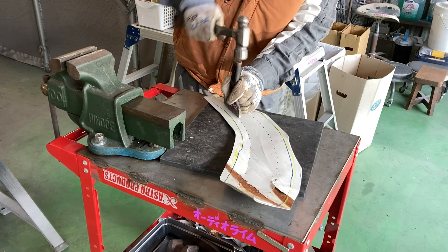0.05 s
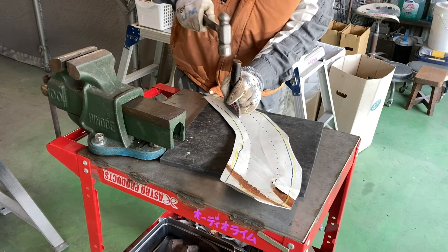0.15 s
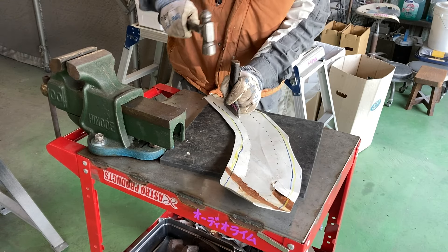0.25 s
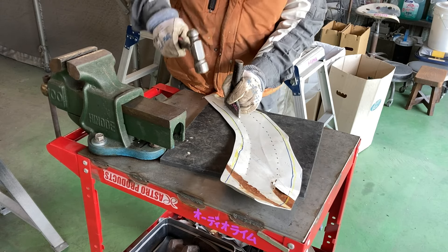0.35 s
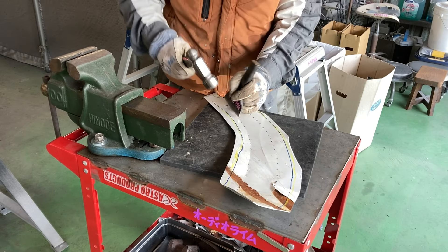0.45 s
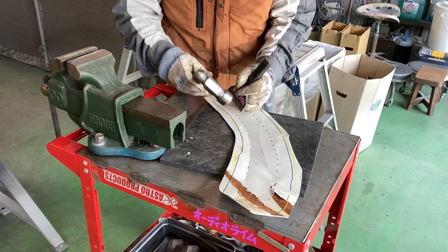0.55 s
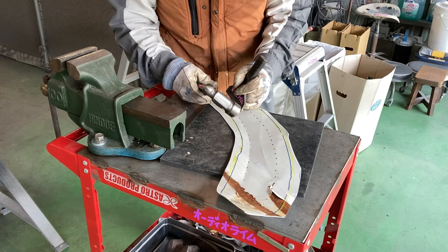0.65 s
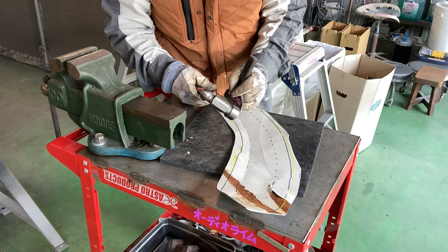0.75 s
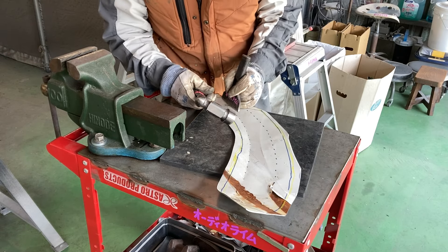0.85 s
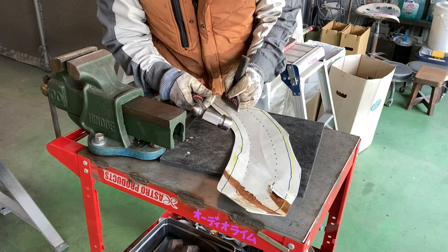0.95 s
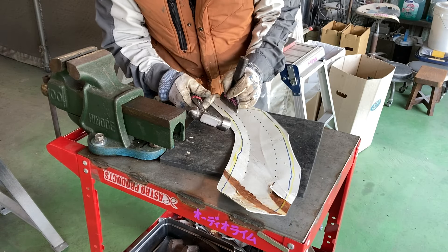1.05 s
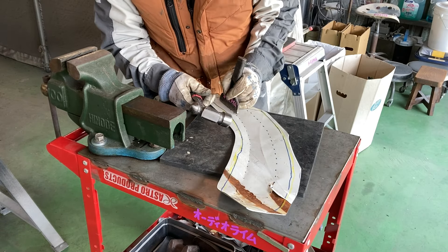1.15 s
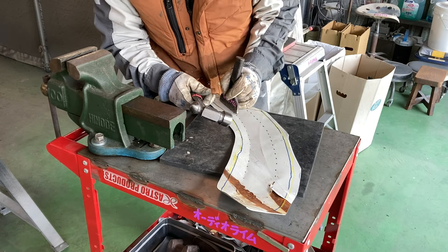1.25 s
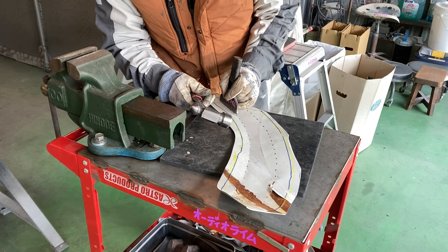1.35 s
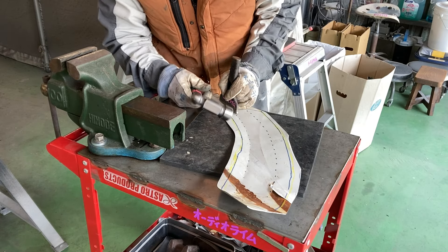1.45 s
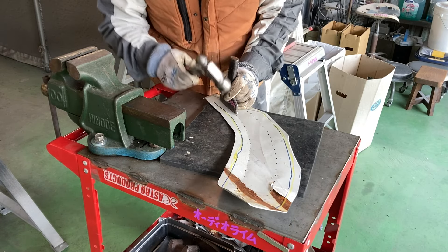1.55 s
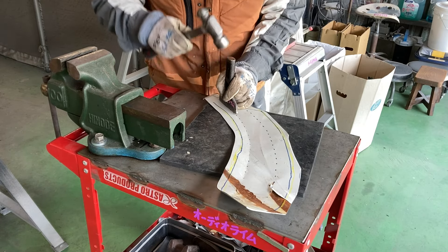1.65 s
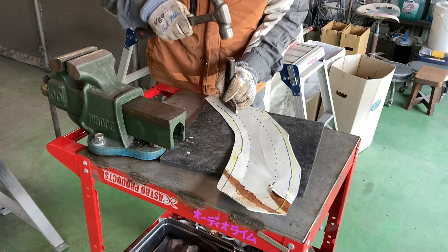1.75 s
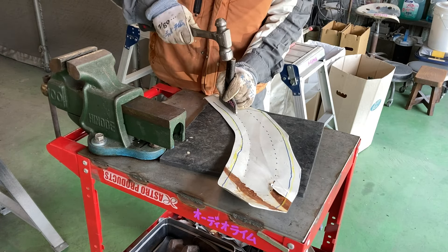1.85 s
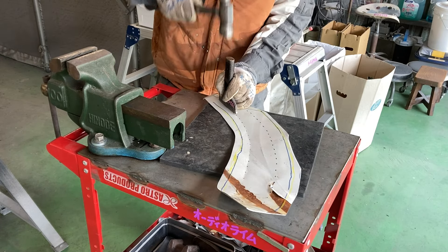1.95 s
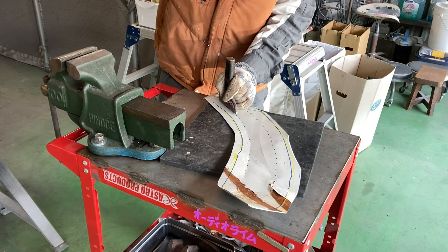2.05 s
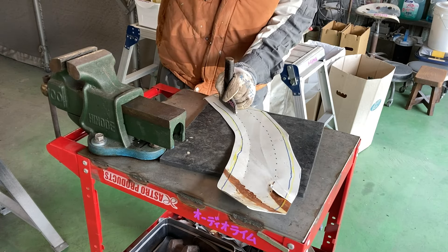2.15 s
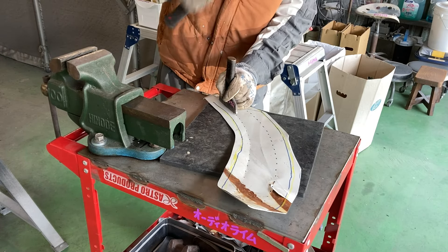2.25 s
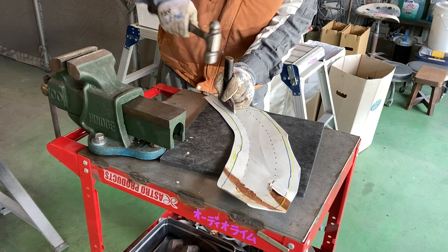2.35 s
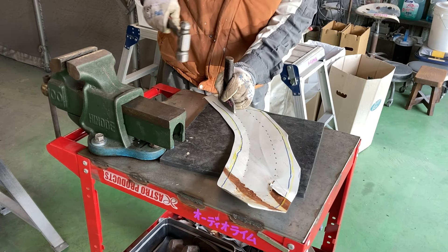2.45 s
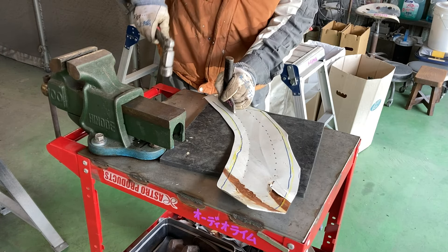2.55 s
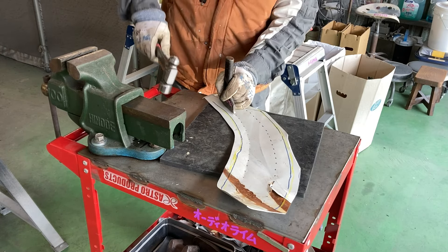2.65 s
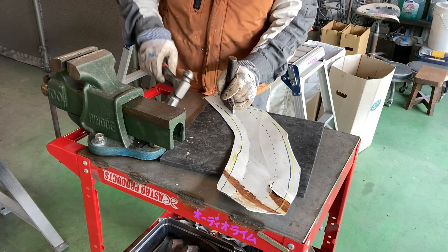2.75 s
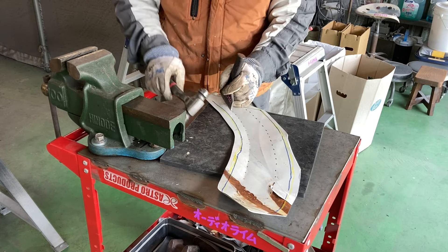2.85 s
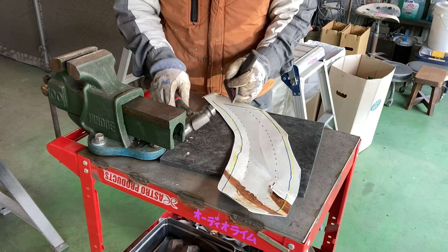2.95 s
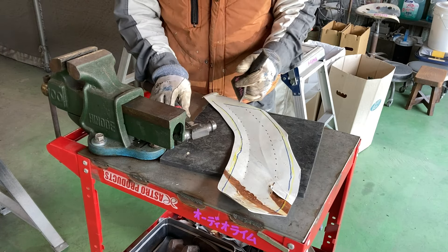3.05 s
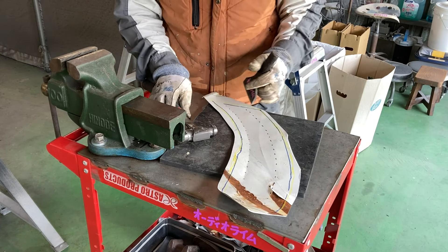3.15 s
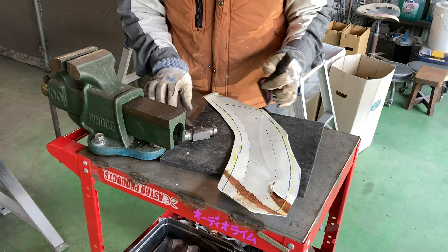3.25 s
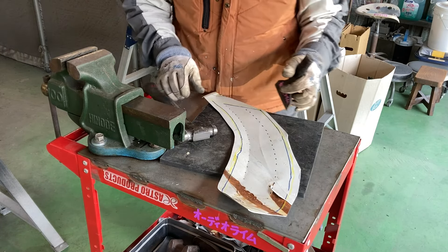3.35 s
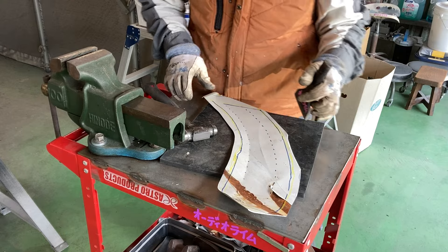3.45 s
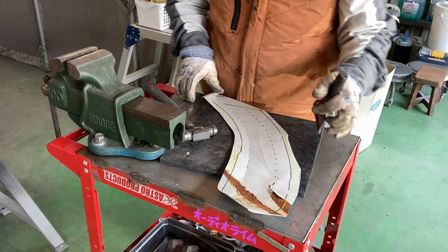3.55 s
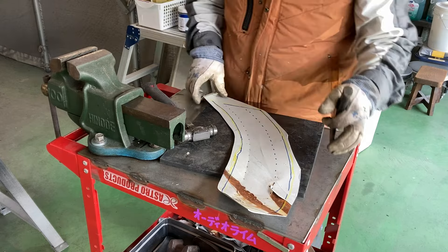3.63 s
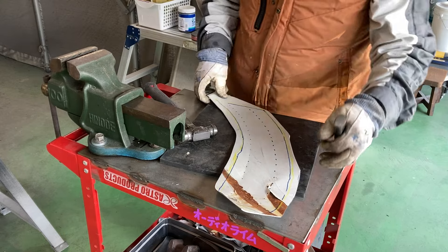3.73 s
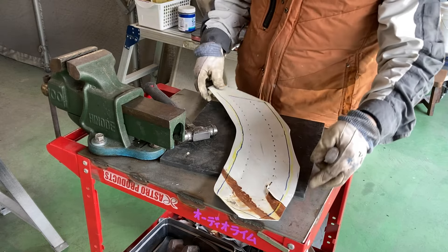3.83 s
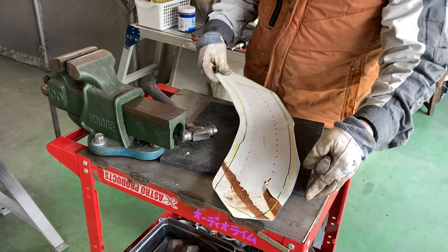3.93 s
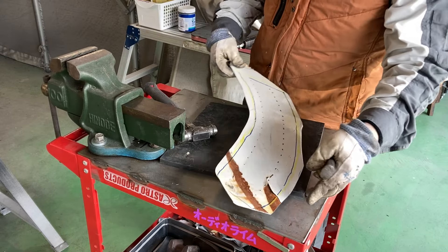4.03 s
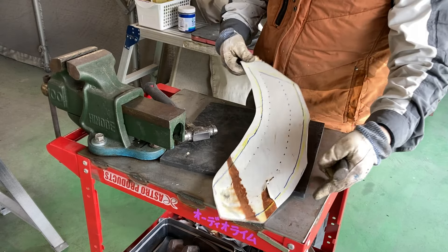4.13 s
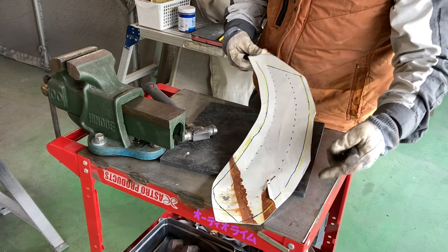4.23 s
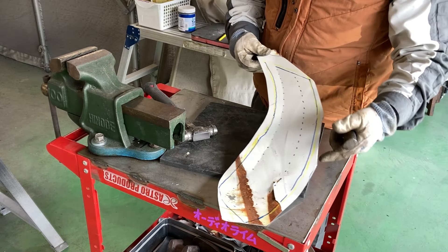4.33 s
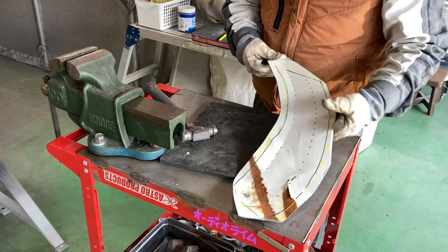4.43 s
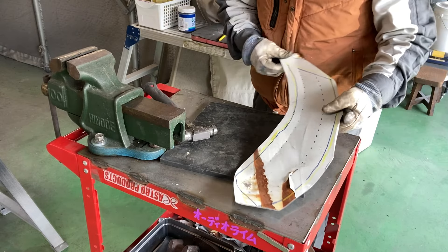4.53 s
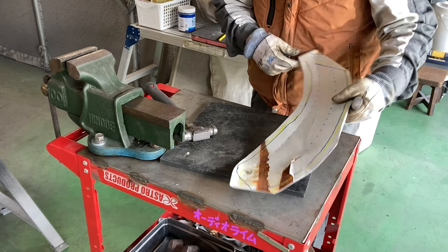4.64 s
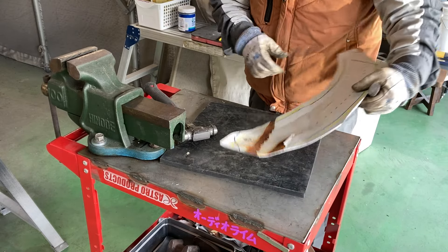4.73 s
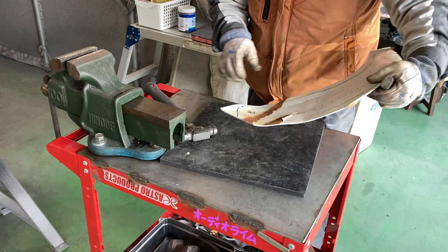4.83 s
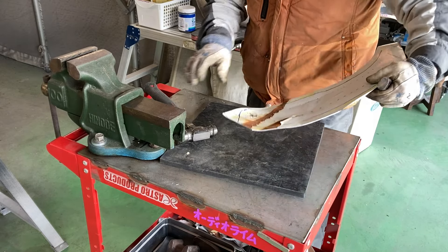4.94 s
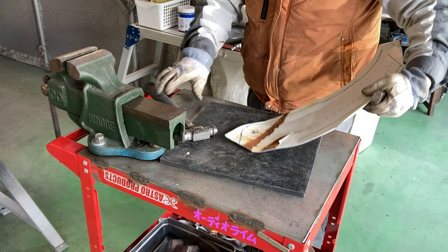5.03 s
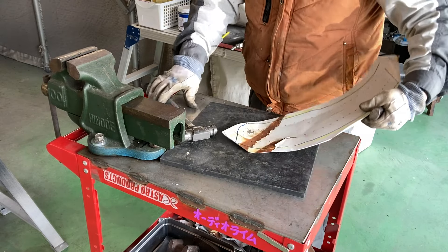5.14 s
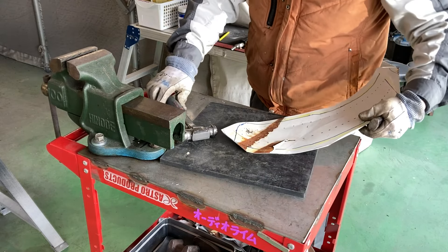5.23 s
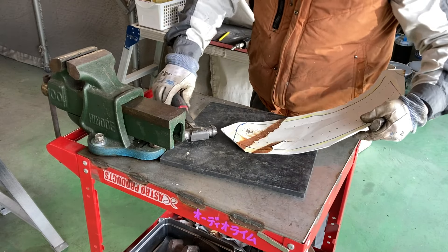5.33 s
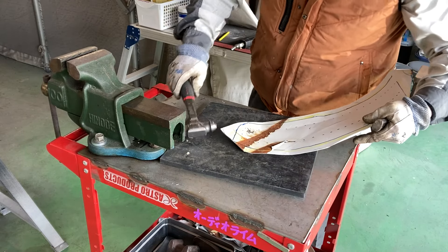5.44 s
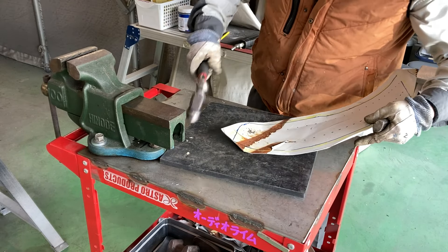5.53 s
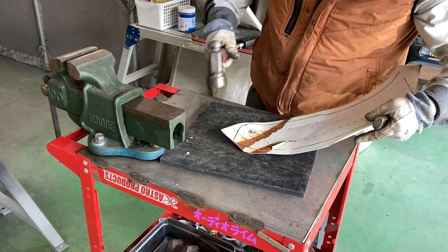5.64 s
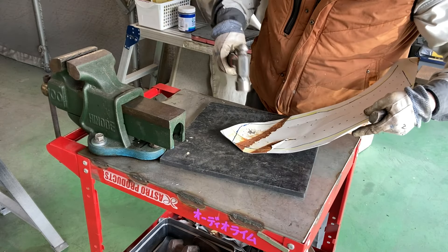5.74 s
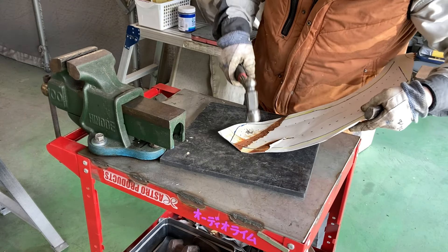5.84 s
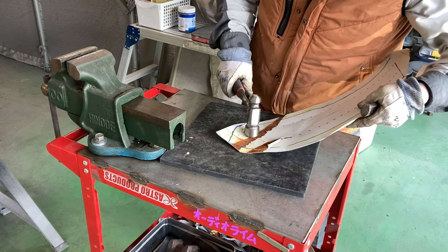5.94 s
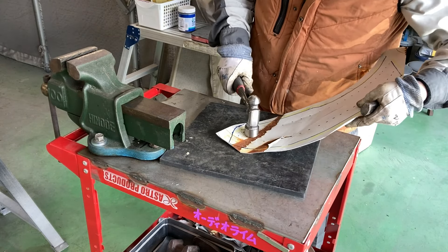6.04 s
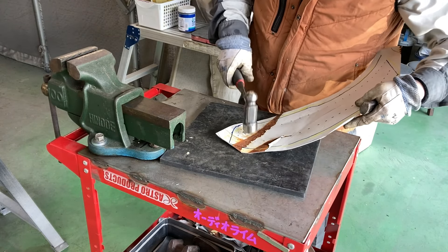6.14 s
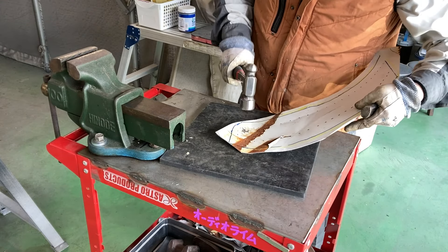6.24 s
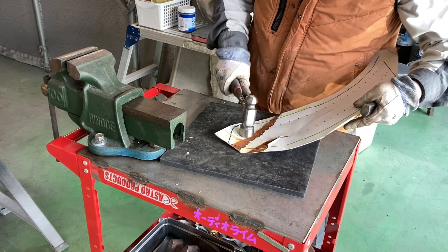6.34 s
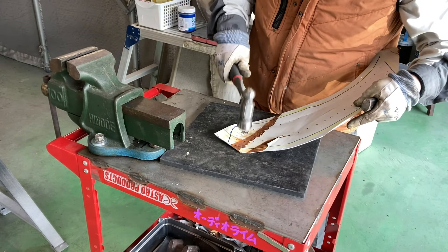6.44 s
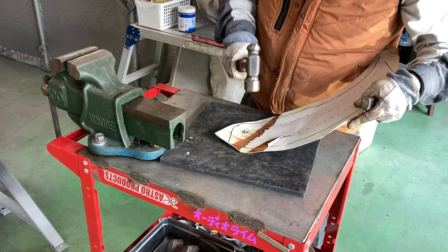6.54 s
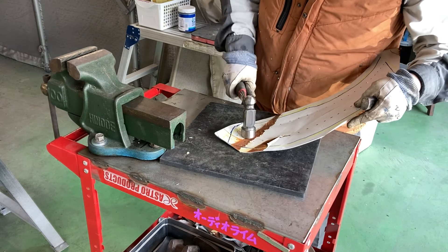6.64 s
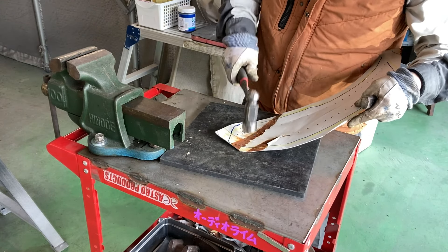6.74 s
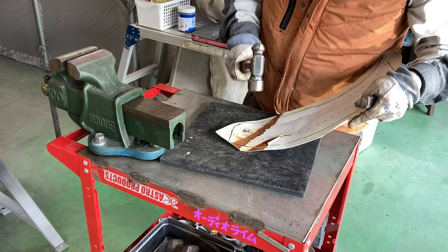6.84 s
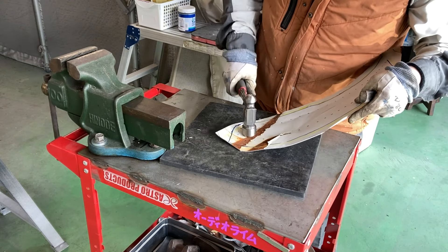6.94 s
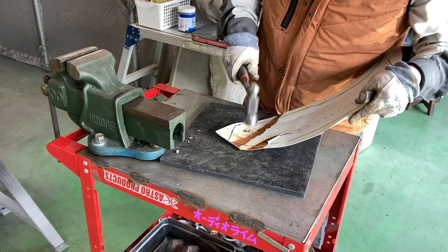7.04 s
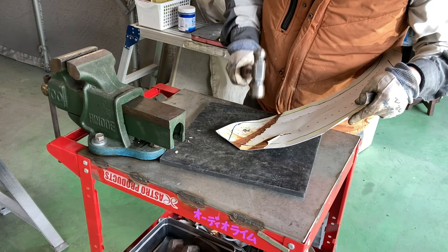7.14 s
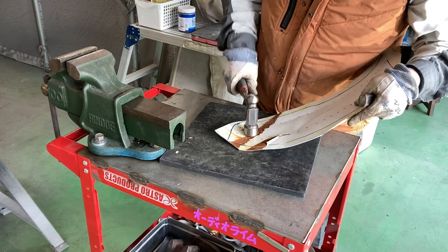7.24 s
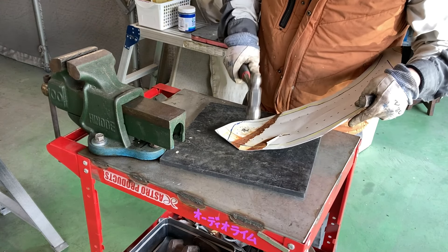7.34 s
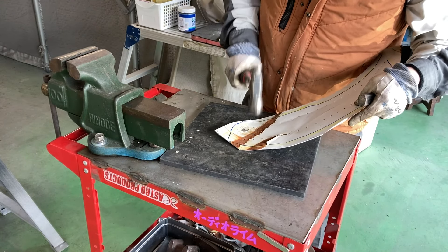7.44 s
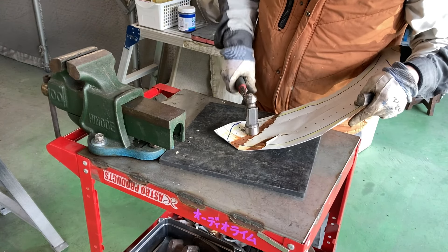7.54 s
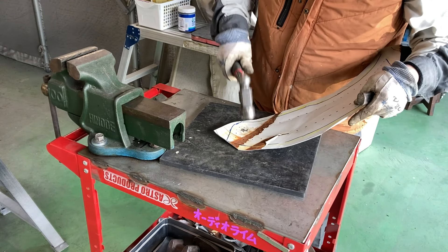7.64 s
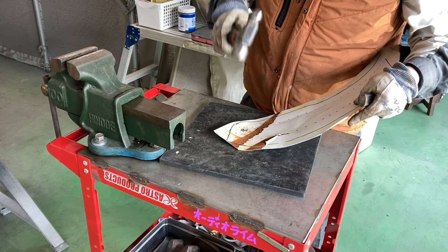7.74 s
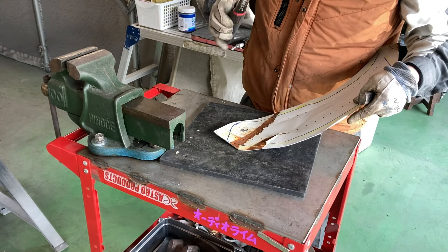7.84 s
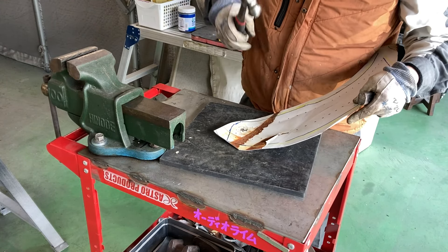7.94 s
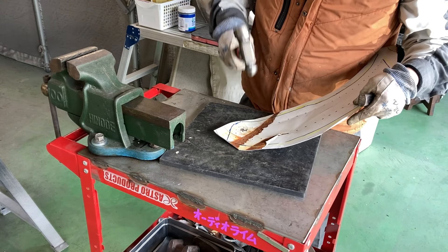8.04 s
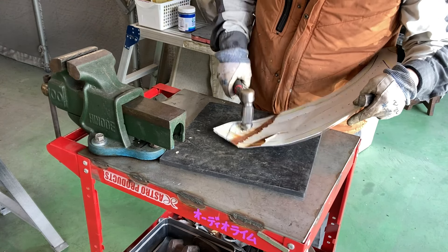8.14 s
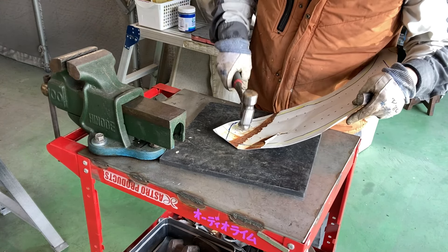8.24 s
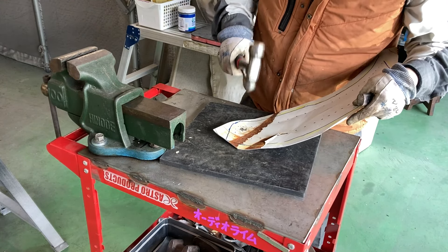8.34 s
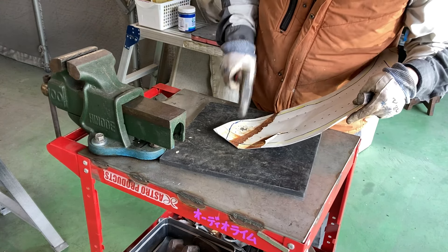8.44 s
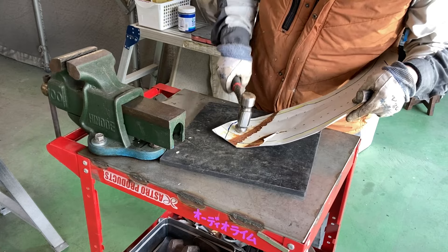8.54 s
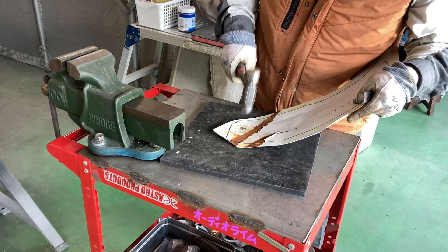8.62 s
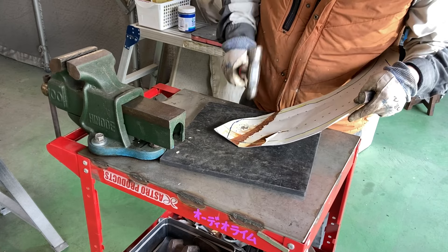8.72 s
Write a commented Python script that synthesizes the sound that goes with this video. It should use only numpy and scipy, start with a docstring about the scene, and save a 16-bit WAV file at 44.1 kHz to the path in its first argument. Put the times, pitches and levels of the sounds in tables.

```python
"""Hard steel cracks and clangs over a deep thump, then rustle, taps and a rising scrape, then flatter blows on sheet metal.
A hammer drives a chisel into a thin steel panel on a bench plate; the heavy blows thump the tool cart under it.
The tools are laid down, the panel is dragged off and turned over, then its tip is hammered flat against the plate.
Blows layer noise bursts with damped modes, cloth and scraping are shaped noise, and the sliding chisel is sines.
A hard-walled workshop answers, and a limiter ducks the hardest blows."""
import sys
import numpy as np
from scipy import signal
from scipy.fft import rfft, irfft, next_fast_len
from scipy.io import wavfile
from scipy.ndimage import uniform_filter1d, minimum_filter1d, map_coordinates

SR = 44100
rng = np.random.default_rng(int(sys.argv[2]) if len(sys.argv) > 2 else 0)


def to_wav(s):
    """Save 16-bit WAV."""
    ch = np.atleast_2d(s).T  # columns
    pcm = np.round(np.clip(ch, -1, 1) * 32767)  # PCM
    wavfile.write(sys.argv[1], SR, pcm.astype(np.int16))


N = 387198

# Hammer on chisel; the first blow is only still ringing. Each row: start in seconds, level in dB, then trims
# in dB for the cart thump, the shank ping, the crack and the bite.
CHISEL_BLOWS = [(-.27, -4, -11, -0.5, -5, 0.5), (0.1013, -2.5, -7.5, 2, 4, 2.5),
                (1.875, -16.5, -26, 10, 3.5, 5.5), (2.3453, -3.5, 1.5, 0.5, 0, 2)]
# Hammer on the panel. Each row: start in seconds, level in dB, then trims in dB for the low knock,
# the steel ring, the crack and the ping.
PANEL_BLOWS = [(5.9635, -20, -7.5, -7.5, 0.5, 5), (6.3555, -9.5, -1.5, -4.5, -9, 1.5),
               (6.6707, -6.5, -3, -3, -6.5, 5), (6.962, -1, 1.5, -2, 5, 1.5),
               (7.2432, -8, 2.5, -2, 1.5, 5.5), (7.5242, -8.5, -1.5, -2.5, -3, -5),
               (8.1953, -12, -2, -9.5, -6.5, -14), (8.5188, -9.5, 1, -6.5, 2, -8)]
# Tools and panel touching the bench. Each row: start in seconds, level in dB before the handling gain,
# brightness in dB per octave, chisel ring in dB against the tap.
TOUCHES = [(1.228, -82, 4, -20), (1.273, -79, 6.5, -18), (3.187, -61.5, -14, -30), (3.266, -55, -7, -22),
           (3.292, -58.5, -14, -35), (3.33, -62, -12, -25), (3.358, -60, -13.5, -30), (3.908, -40, -2, -29),
           (4.2134, -35.5, 6, -4), (4.343, -55.5, 3, -20), (4.427, -57, 5, -9), (4.498, -41.5, 4, -14.5),
           (5.0106, -65, 1.5, -29), (5.1069, -43.5, -4.5, -30), (5.133, -48.5, 4, -28)]
# Jacket and gloves rustling once for each arm move. Each row: fastest moment in seconds, level in dB before the
# handling gain, swell in seconds, fade in seconds, brightness in dB per octave.
ARM_MOVES = [(1.2, -79, .15, .17, -2.5), (1.605, -56.5, 0.046, 0.12, -0.5), (3.2, -80, 0.045, .15, 2),
             (3.47, -78, 0.036, 0.071, 3), (3.801, -75, .17, 0.17, 3.5), (5.03, -67, .02, 0.24, 2),
             (5.86, -69.5, 0.14, .1, 1.5)]

# Modes of the chisel standing on panel and plate. Each row: pitch in Hz, relative level in dB, T60 in seconds.
CHISEL_MODES = [(295, -11, .1), (320, -13, .12), (512, -11, .26), (550, -15, .13), (590, -15, .1),
                (820, -16, .14), (1090, -15, .11), (1211, -19, .15), (1960, -18, .08), (2455, -15, .08),
                (2800, -14, .04), (3500, -13, .04), (3725, -13, .06), (4300, -13, .035), (4700, -14, .035),
                (4930, -13, .04), (7537, -24, .2)]
# Modes of the bench plate knocked through the sheet. Each row: pitch in Hz, relative level in dB, T60 in seconds.
PLATE_MODES = [(169.6, -15.5, 0.12), (244.8, -6, 0.14), (302.3, -7, 0.11), (314, -2, 0.091),
               (337.4, 0, 0.051), (417, -11, 0.13)]
# Modes of the free part of the panel. Each row: pitch in Hz, relative level in dB, T60 in seconds.
PANEL_MODES = [(501, -18, .15), (584, -3, .15), (655, -13, .1), (728, -7, .14), (808, -26, .9),
               (878, -18, .15), (1022, -11, .25), (1128, -12, .18), (1270, -18, .16), (1520, -17, .12),
               (1683, -17, .17), (1873, -20, .15), (2016, -16, .13), (2400, -18, .17), (2642, -19, .16),
               (3310, -24, .13), (3560, -23, .13), (3860, -23, .13), (4310, -19, .06), (4474, -24, .1)]
# Modes of the loose chisel. Each row: pitch in Hz, relative level in dB, T60 in seconds.
LOOSE_CHISEL_MODES = [(350, -14, 0.35), (967, 0.5, 0.12), (1453, 4, .14), (1537, 1, 0.324),
                      (1760, -11, .15), (1977, 6.5, 0.088), (2169, -9.5, 0.37), (3031, -16, 0.21),
                      (4370, -7, 0.12), (4420, -10.5, .1), (6890, -16, 0.18)]
# Tones of the sliding chisel. Each row: pitch in Hz, relative level in dB.
SLIDE_TONES = [(1954, -0.5), (4619, -12.5), (4965, -8), (6406, -30)]

# Colour of steel cracking on steel. Each row: frequency in Hz, relative density in dB per Hz.
CRACK_COLOUR = [(60, -27.5), (300, 1.5), (1000, -4.5), (2400, -2.5), (4300, -5), (5800, -11), (8000, -2),
                (11000, -1), (14000, -4.5), (16000, -8)]
# Colour of the sheet slap, also used for the chisel's bite. Each row: frequency in Hz, relative density in dB per Hz.
SLAP_COLOUR = [(40, -23.5), (150, -12.5), (400, -0.5), (1000, 0.5), (1600, -3.5), (2400, -3), (4400, -4.5),
               (5800, -9), (8000, -11.5), (16000, -23)]
# Colour of the clang under the chisel. Each row: frequency in Hz, relative density in dB per Hz.
CHISEL_CLANG_COLOUR = [(40, -20.5), (130, -11), (200, -5), (300, -2), (550, -2), (1100, 2.5), (1600, -2.5),
                       (2500, -3), (4300, -6), (5800, -7), (8000, -11), (12000, -17.5), (16000, -15)]
# Colour of the clang under the panel. Each row: frequency in Hz, relative density in dB per Hz.
PANEL_CLANG_COLOUR = [(40, -75), (130, -5), (270, 4), (600, -0.5), (1100, -1), (1500, -4.5), (2400, -0.5),
                      (3200, -9.5), (4400, -6.5), (5800, -11), (8000, -11), (12000, -14), (16000, -21.5)]
# Colour of the cart's shuddering frame. Each row: frequency in Hz, relative density in dB per Hz.
SHUDDER_COLOUR = [(10, -40), (25, -9.5), (50, -2), (110, -2), (170, -1.5), (240, -12.5), (500, -43.5),
                  (2000, -100)]
# Colour of a light contact. Each row: frequency in Hz, relative density in dB per Hz.
TOUCH_COLOUR = [(40, -40), (200, -2.5), (500, 3.5), (1000, 3), (2000, 0.5), (3200, -13), (4500, -12.5),
                (6000, -24.5), (11000, -21), (16000, -30)]
# Colour of the grating edge. Each row: frequency in Hz, relative density in dB per Hz.
SCRAPE_COLOUR = [(120, -26), (200, -42), (340, -9), (1080, -13.5), (5840, -9.5), (7410, -10), (9060, -8),
                 (10900, -6.5), (16000, -25)]
# Colour of rustling cloth. Each row: frequency in Hz, relative density in dB per Hz.
CLOTH_COLOUR = [(100, -11.5), (250, 1), (600, 2), (1200, -7), (3000, -14), (6000, -23.5), (12000, -26),
                (16000, -28)]
# Colour of the steady background. Each row: frequency in Hz, relative density in dB per Hz.
FLOOR_COLOUR = [(15, -43), (25, -11), (97, 2.5), (120, -4.5), (285, -12), (344, -31), (476, -23.5),
                (516, -28.5), (607, -31.5), (2110, -33.5), (2550, -38.5), (2990, -54), (16000, -44.5)]

# How long the clangs last. Each row: frequency in Hz, T60 in seconds.
CLANG_T60 = [(200, 0.33), (1000, 0.35), (4000, 0.31), (14000, 0.25)]
# How long the workshop rings. Each row: frequency in Hz, T60 in seconds.
ROOM_T60 = [(60, 0.26), (250, 0.72), (1000, 0.85), (2500, 0.78), (5000, 0.61), (8000, 0.44), (14000, 0.34)]
# How strongly the workshop answers. Each row: frequency in Hz, level in dB.
ROOM_LEVEL = [(60, -24), (150, -9), (320, -10), (700, -8), (2500, -7.5), (5000, -7.5), (9000, -9),
              (15000, -15.5)]
# Copies from the vice, floor and near furniture. Each row: delay in seconds, level in dB.
ECHOES = [(.0042, -13.5), (0.012, -12.5), (0.02, -13), (.031, -16.5)]
# Stereo likeness of diffuse noise. Each row: frequency in Hz, left-right correlation.
LIKENESS = [(60, .92), (130, 0.86), (300, 0.82), (700, 0.29), (2000, .3), (4500, 0.17), (8000, .93),
            (15000, .94)]
# Phase between the channels. Each row: frequency in Hz, lead of left over right in radians.
PHASE_LEAD = [(100, 0), (2000, -.2), (4400, -.3), (5340, -3.7), (6630, -5.8), (9100, -9.4), (11200, -12.4),
              (13700, -15.7), (16500, -19)]
# Level between the channels. Each row: frequency in Hz, left minus right in dB.
BALANCE = [(100, -1.5), (600, 0.93), (1200, 2), (2400, 2), (4500, 1.3), (9000, -0.24)]

HANDLING_GAIN_DB = 2  # lifts touches, drag, slide and cloth, with their room sound
STILL_CLOTH_DB = -81  # rustle between moves, before the handling gain
FOLDS_DB, FOLDS_PER_S = 2.25, 25  # depth and pace of the folds
CRINKLE_DB, CRINKLES_PER_S = 1.5, 220  # depth and pace of the fine grain of the cloth
SLIDE_START_S, SLIDE_PUSH_S, SLIDE_T60_S = 0.59, 0.125, 0.57
SLIDE_DB = -58.5  # before the handling gain
DRAG_START_S, DRAG_END_S, DRAG_RELEASE_S = 4.52, 4.738, 0.0053  # release is a time constant
DRAG_DB, DRAG_GROWTH = -57.5, 0.75  # end level before the handling gain; power of the swell
DRAG_LOW_HZ, DRAG_HIGH_HZ, DRAG_BEND = 905, 3270, 2.6  # resonance at start and end; how late it climbs
SWAY_HZ, SWAY_DB, SWAY_T60_S = 42.82, -36.5, 0.72  # cart rocking on its wheels, level within the thump
TOP_HZ = 15900  # upper band limit


def amp(db):
    """Turn decibels into a linear gain."""
    return 10 ** (np.asarray(db) / 20)


def unit(x):
    """Scale to an rms of 1."""
    return x / np.sqrt(np.mean(x ** 2) + 1e-20)


def along(points, hz):
    """Read a curve of (Hz, value) points on a log frequency axis."""
    f, v = np.transpose(points)
    return np.interp(np.log(hz + 1), np.log(f + 1), v)


def wobble(rate, size=N):
    """Draw a smooth random curve with rate knots a second."""
    knots = rng.standard_normal(int(size * rate / SR) + 4)
    return map_coordinates(knots, [np.arange(size) * rate / SR])


def filtered(x, response):
    """Multiply the spectrum of x by a response of frequency."""
    n = x.shape[-1]
    m = next_fast_len(n + SR // 10)
    spectrum = rfft(x, m) * response(np.fft.rfftfreq(m, 1 / SR))
    return irfft(spectrum, m)[..., :n]


def tilted(colour, db_per_octave):
    """Make a noise colour brighter or duller about 1 kHz."""
    return [(hz, level + db_per_octave * np.log2(hz / 1000)) for hz, level in colour]


def noise(colour, size=SR, width=1):
    """Make coloured stereo noise; width 0 is a point source, 1 a diffuse one."""
    def mid_side(hz):
        turn = width * np.arccos(np.clip(along(LIKENESS, hz), -1, 1)) / 2
        return amp(along(colour, hz)) * [np.cos(turn), np.sin(turn)]

    mid, side = filtered(rng.standard_normal((2, size)), mid_side)
    return np.array([mid + side, mid - side])


def decay(t60):
    """Fall exponentially for one second, by 60 dB every t60 seconds."""
    return np.exp(-np.log(1000) * np.arange(SR) / SR / t60)


def rise(attack):
    """Swell smoothly for one second with a time constant of attack seconds."""
    return 1 - np.exp(-np.arange(SR) / SR / attack)


def fading(x, t60s):
    """Let each frequency of x die at its own speed."""
    hz, t, z = signal.stft(x, SR, nperseg=256)
    damping = np.exp(-np.log(1000) * t / along(t60s, hz)[:, None])
    return signal.istft(z * damping, SR, nperseg=256)[1][:, :SR]


def favour(modes, centre_hz, db):
    """Where a blow lands decides how strongly the modes around one pitch sing."""
    def boost(hz):
        return db * np.exp(-(np.log2(hz / centre_hz) / 0.12) ** 2)

    return [(hz, level + boost(hz), t60) for hz, level, t60 in modes]


def ring(modes, scatter_db, attack, loose=1, chatter=0):
    """Sum damped modes at random strengths; loose = 0 starts them in step, chatter blurs their lines."""
    t = np.arange(SR) / SR
    out = np.zeros((2, SR))
    for (hz, db, t60), (size, phase, skew) in zip(modes, rng.standard_normal((len(modes), 3))):
        # less alike frequencies start further apart in left and right
        apart = skew * np.arccos(np.clip(along(LIKENESS, hz), -1, 1)) * np.array([[0.35], [-0.35]])
        # phase wanders at random, chatter in radians per root second
        drift = chatter * np.cumsum(rng.standard_normal(SR)) / np.sqrt(SR)
        tone = np.sin(2 * np.pi * hz * t + np.pi * loose * phase + apart + drift)
        out += amp(db + scatter_db * size) * decay(t60) * tone
    return out * rise(attack)


def stroke(start, end, release):
    """Give the share of a stroke's time that has passed (0-1) and a gain that dies away after its end."""
    t = np.arange(N) / SR
    done = np.clip((t - start) / (end - start), 0, 1)
    return done, np.exp(-np.maximum(t - end, 0) / release)


def add(track, s, sound):
    """Lay a sound into the track at time s, trimming what falls outside."""
    start = round(s * SR)
    part = sound[:, max(-start, 0):N - start]
    first = max(start, 0)
    track[:, first:first + part.shape[1]] += part


def echoed(x):
    """Near surfaces return delayed, weaker copies of a sharp sound."""
    copies = (amp(db) * np.pad(x, ((0, 0), (round(s * SR), 0)))[:, :SR] for s, db in ECHOES)
    return x + sum(copies)


def in_room(x, delay=0.0099):
    """Hard walls answer with a diffuse tail, delay seconds behind the direct sound."""
    tail = fading(noise(ROOM_LEVEL), ROOM_T60) * np.sqrt(2 * np.log(1000) / SR)
    late = np.pad(x.mean(0), (round(delay * SR), 0))
    return x + signal.fftconvolve(late[None], tail, axes=1)[:, :x.shape[1]]


def thump(start_hz, end_hz, settle, t60):
    """The cart is stiff while the blow presses on it and slack afterwards, so its pitch sinks; then it sways."""
    hz = start_hz + (end_hz - start_hz) * rise(settle)
    boom = amp(-1.5) * np.sin(2 * np.pi * np.cumsum(hz) / SR) * decay(t60)
    frame = amp(-7) * unit(noise(SHUDDER_COLOUR)) * decay(0.1)
    sway = amp(SWAY_DB) * np.sin(2 * np.pi * SWAY_HZ * np.arange(SR) / SR) * decay(SWAY_T60_S)
    return (boom + frame + sway) * rise(0.0035)


def chisel_blows():
    """Steel cracks on steel, the edge bites a moment later; a dense clang, ringing modes and the cart's thump follow."""
    out = np.zeros((2, N))
    for s, db, thump_db, ping_db, crack_db, bite_db in CHISEL_BLOWS:
        crack = amp(crack_db) * unit(noise(CRACK_COLOUR, width=0.98)) * decay(0.016)
        bite_noise = unit(noise(tilted(SLAP_COLOUR, db_per_octave=1.46), width=0.9))
        bite = amp(bite_db + 8) * bite_noise * decay(0.024) * rise(0.005)
        # harder blows shake disproportionately more clatter out of the bench
        clang = amp(-7.5 + 0.071 * db) * fading(unit(noise(CHISEL_CLANG_COLOUR)), CLANG_T60)
        steel = ring(favour(CHISEL_MODES, 4800, ping_db), scatter_db=1.5, attack=0.002, chatter=4.2)
        cart = amp(thump_db) * thump(start_hz=125, end_hz=42, settle=0.021, t60=0.13)
        # the cart's thump stays dry
        add(out, s, amp(db) * (in_room(echoed(crack + bite) + clang + steel) + cart))
    return out


def background():
    """Steady, mostly low noise lies under everything."""
    return amp(-68.5) * unit(noise(FLOOR_COLOUR, size=N))


def sleeves():
    """Cloth rustle swells as an arm gathers speed and fades as it stops; folds and crinkles roughen it."""
    out = amp(STILL_CLOTH_DB) * unit(noise(CLOTH_COLOUR, size=N))
    t = np.arange(SR) / SR - 0.5  # the fastest moment sits mid-way
    for s, db, swell, fade, bright_db in ARM_MOVES:
        speed = np.exp(-(t / np.where(t < 0, swell, fade)) ** 2)
        add(out, s - 0.5, amp(db) * speed * unit(noise(tilted(CLOTH_COLOUR, bright_db))))
    roughness_db = FOLDS_DB * wobble(FOLDS_PER_S) + CRINKLE_DB * wobble(CRINKLES_PER_S)
    return out * unit(amp(roughness_db))


def slide():
    """As the chisel's edge slides to a new spot, friction builds up unsteady steel tones that then ring out."""
    t = np.arange(N) / SR
    tones = np.zeros(N)
    for hz, db in SLIDE_TONES:
        strength = amp(db + 2.5 * wobble(25))
        tones += strength * np.sin(2 * np.pi * hz * t + 0.6 * wobble(40))
    done, ringing = stroke(SLIDE_START_S, SLIDE_START_S + SLIDE_PUSH_S, SLIDE_T60_S / np.log(1000))
    return amp(SLIDE_DB) * done * ringing * tones


def touches():
    """Light contacts tap with a short noise burst, dull or bright, and the loose chisel rings along."""
    out = np.zeros((2, N))
    for s, db, bright_db, ring_db in TOUCHES:
        tap = unit(noise(tilted(TOUCH_COLOUR, bright_db))) * decay(0.11)
        chisel = amp(ring_db) * ring(LOOSE_CHISEL_MODES, scatter_db=0.5, attack=0.0026, chatter=3.0)
        add(out, s, amp(db) * (tap + chisel))
    return out


def drag():
    """The panel's edge grates over the plate; a rough resonance and its octave climb as it lifts away."""
    done, contact = stroke(DRAG_START_S, DRAG_END_S, DRAG_RELEASE_S)
    hz = DRAG_LOW_HZ + (DRAG_HIGH_HZ - DRAG_LOW_HZ) * done ** DRAG_BEND
    phase = 2 * np.pi * np.cumsum(hz) / SR
    grit = unit(noise(SCRAPE_COLOUR, size=N) * amp(2.4 * wobble(300)))
    # slow noise modulates each tone, which widens it into a rough band
    slow_noise = filtered(rng.standard_normal((2, N)), lambda f: np.exp(-(f / 260) ** 2))
    low, high = unit(slow_noise)
    resonance = amp(-0.5) * low * np.sin(phase)
    octave = amp(-9.5) * high * np.sin(2 * phase)
    return amp(DRAG_DB) * done ** DRAG_GROWTH * contact * (grit + resonance + octave)


def panel_blows():
    """The hammer face cracks on the sheet, which slaps onto the plate and rattles briefly against it."""
    out = np.zeros((2, N))
    for s, db, knock_db, ring_db, crack_db, ping_db in PANEL_BLOWS:
        crack = amp(crack_db) * unit(noise(CRACK_COLOUR, width=1.0)) * decay(0.03)
        slap = amp(-2.0) * unit(noise(SLAP_COLOUR, width=0.43)) * decay(0.037) * rise(0.0048)
        rattle = amp(2 * wobble(600, size=SR))
        # harder blows clang disproportionately more
        clang = amp(-3.5 + 0.15 * db) * fading(unit(noise(PANEL_CLANG_COLOUR, width=1.0)), CLANG_T60) * rattle
        sheet_modes = favour(PANEL_MODES, 1020, ping_db)
        sheet = amp(ring_db) * ring(sheet_modes, scatter_db=1, attack=0.002, chatter=3.5)
        # the heavy plate takes a few milliseconds to get moving
        plate = ring(PLATE_MODES, scatter_db=1.5, attack=0.0038, loose=0, chatter=3.5) * rise(0.0038)
        knock = amp(knock_db + 1.5) * plate
        add(out, s, amp(db) * in_room(echoed(crack + slap) + clang + sheet + knock))
    return out


def scene():
    """Mix the blows, the handling between them and the background."""
    handling = in_room(sleeves() + slide() + touches() + drag())
    return chisel_blows() + background() + amp(HANDLING_GAIN_DB) * handling + panel_blows()


def limiter(x, ceiling_db, hold, release):
    """Gain drops almost at once above the ceiling, holds, then recovers at release dB a second."""
    power = np.abs(uniform_filter1d(np.mean(x ** 2, 0), size=256))
    level_db = 10 * np.log10(power + 1e-12)
    span = 2 * int(hold * SR / 2) + 1
    headroom_db = np.minimum(ceiling_db - level_db, 0)
    # the origin makes the hold look back in time
    held_db = -minimum_filter1d(headroom_db, span, origin=span // 2, mode="constant")
    ramp = release * np.arange(N) / SR
    cut_db = np.maximum.accumulate(held_db + ramp) - ramp
    return x * amp(-uniform_filter1d(cut_db, size=64))


def record(dry):
    """Left and right differ in phase and level; a limiter, soft clipping and a steep band limit follow."""
    halves = np.array([[0.5], [-0.5]])  # half the difference to each side

    def channels(hz):
        lead = np.interp(hz, *np.transpose(PHASE_LEAD))
        return amp(halves * along(BALANCE, hz)) * np.exp(1j * halves * lead)

    x = filtered(dry, channels)
    x = limiter(x, ceiling_db=-10.5, hold=0.11, release=64)
    x = x / (1 + (x / 0.92) ** 6) ** (1 / 6)  # soft clip
    return filtered(x, lambda hz: 1 / np.sqrt(1 + (hz / TOP_HZ) ** 160))


dry = scene()
out = record(dry)
to_wav(out)
```